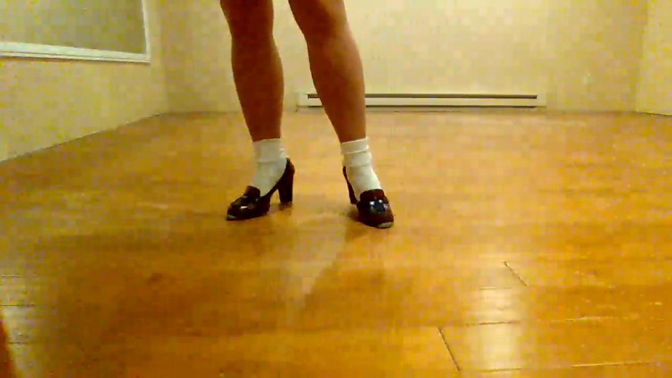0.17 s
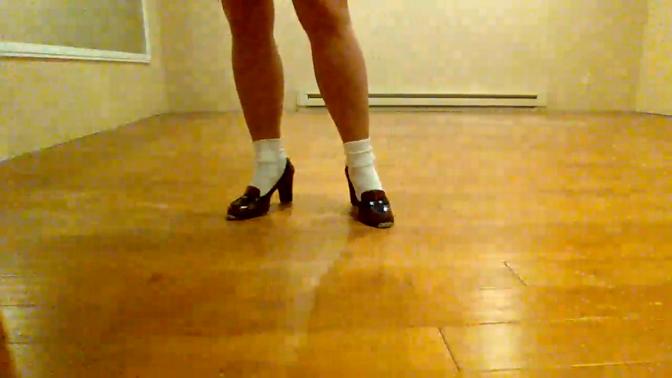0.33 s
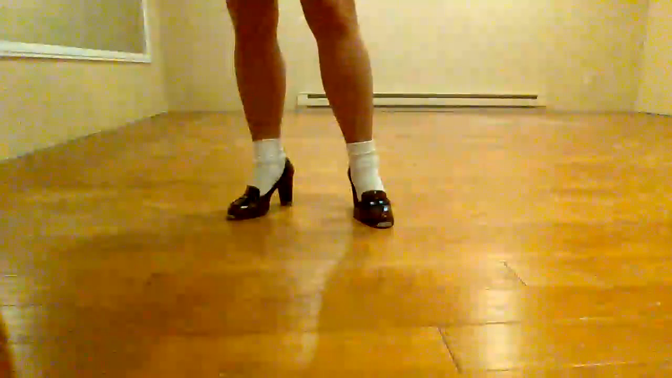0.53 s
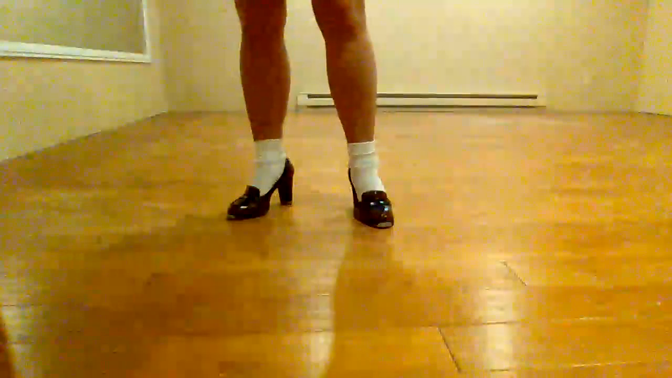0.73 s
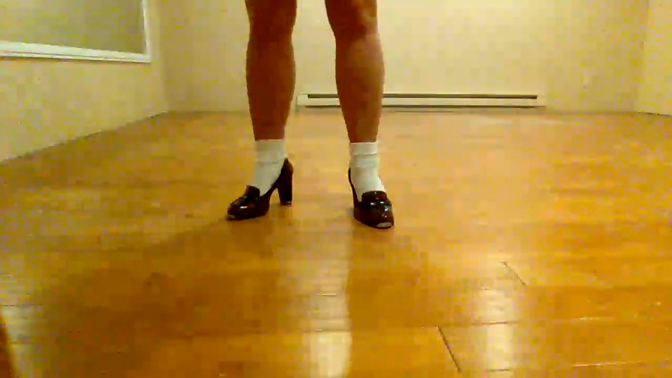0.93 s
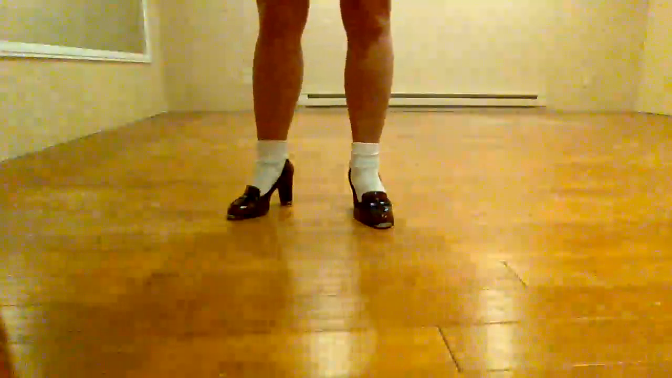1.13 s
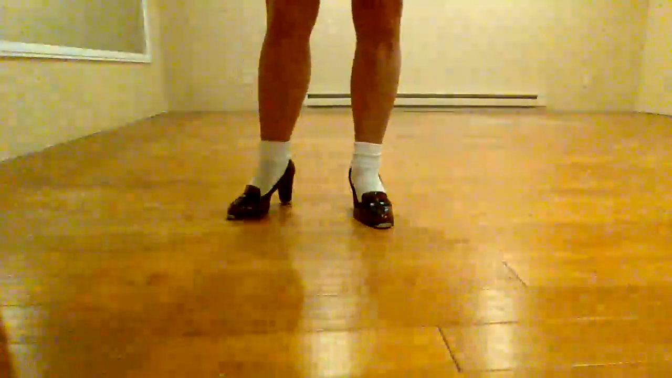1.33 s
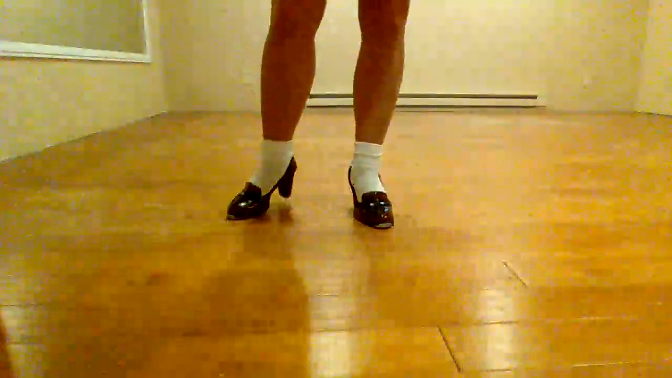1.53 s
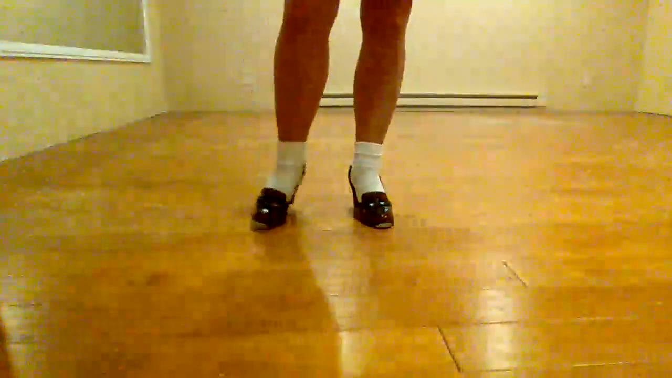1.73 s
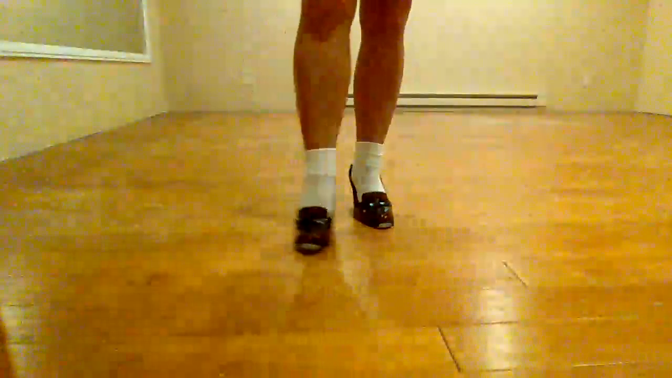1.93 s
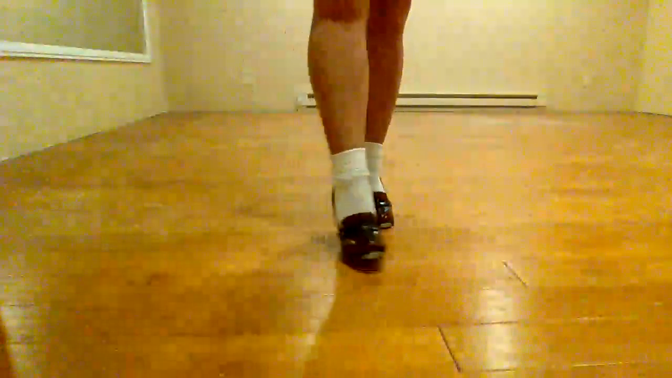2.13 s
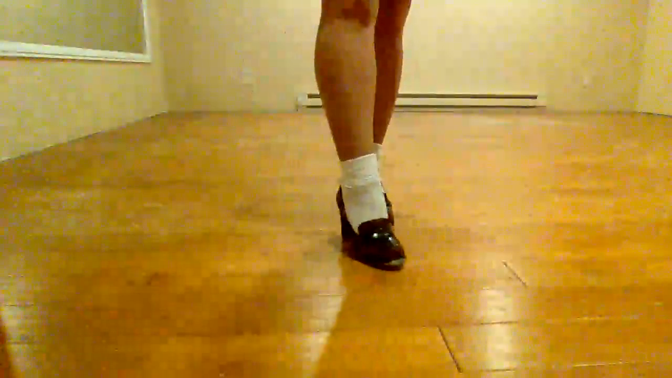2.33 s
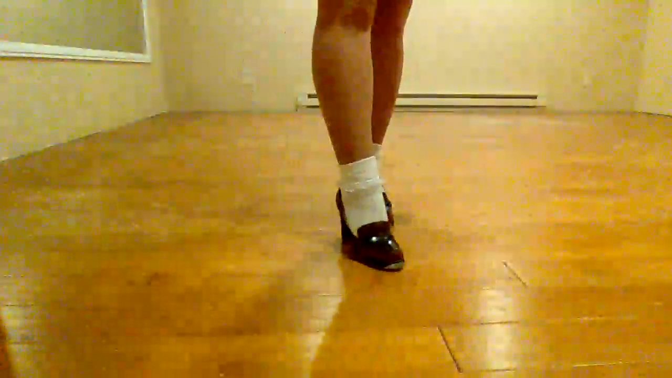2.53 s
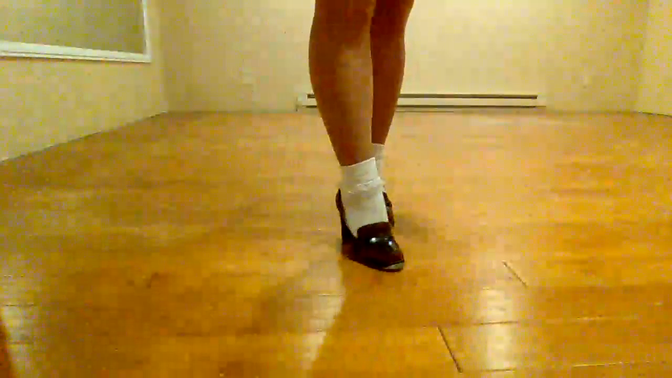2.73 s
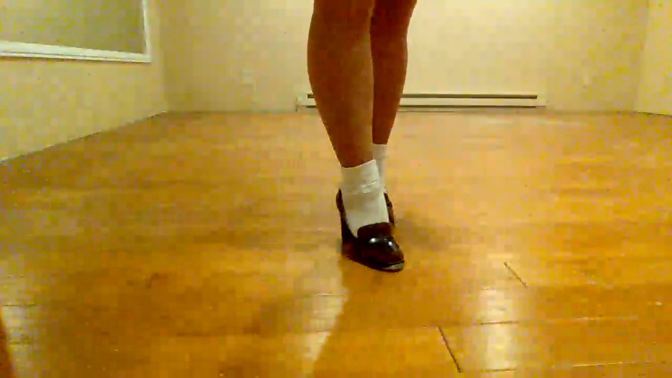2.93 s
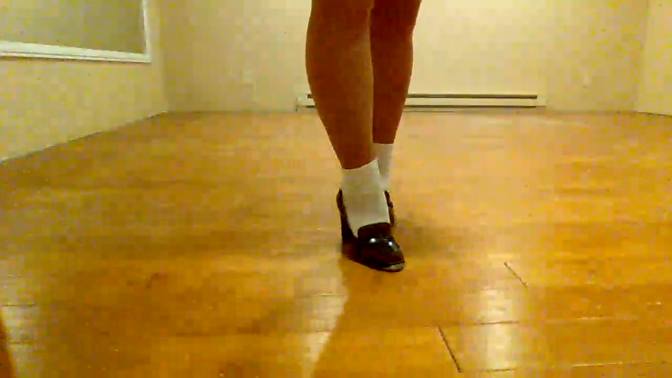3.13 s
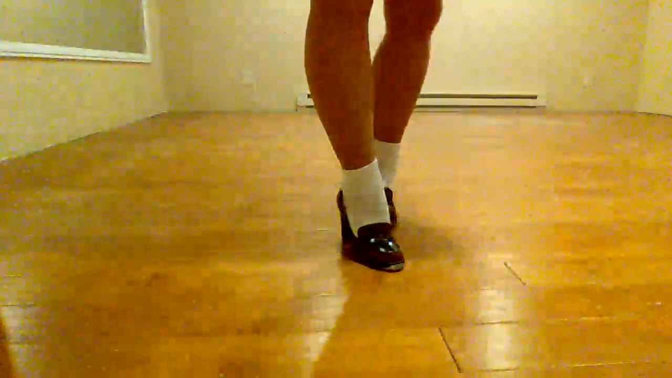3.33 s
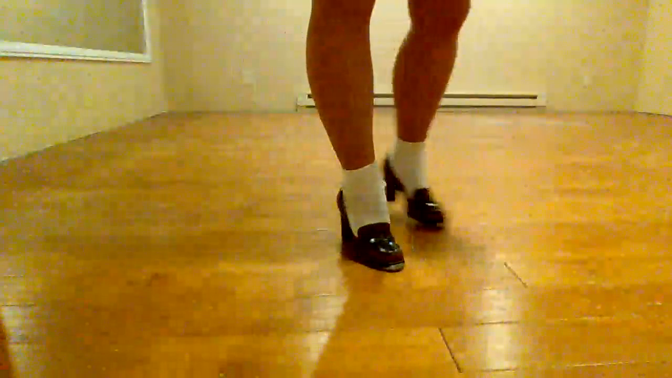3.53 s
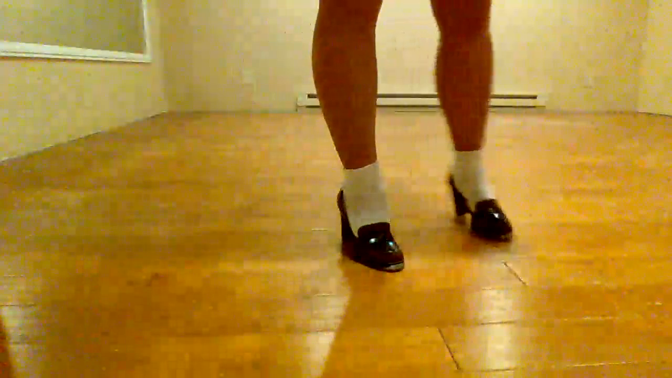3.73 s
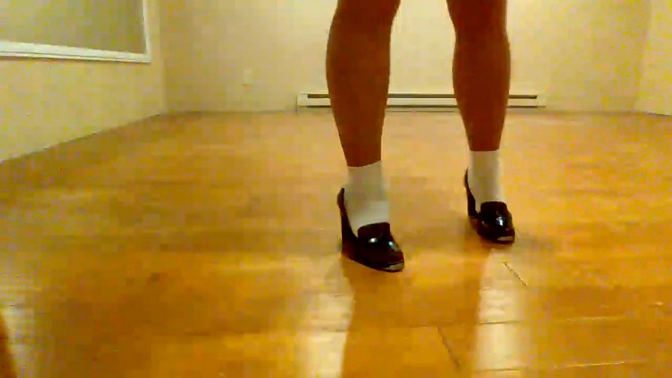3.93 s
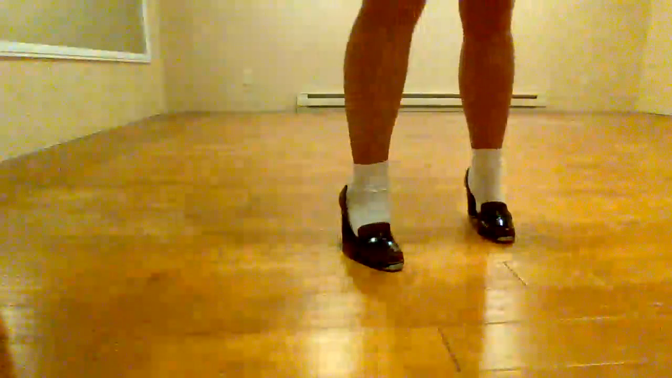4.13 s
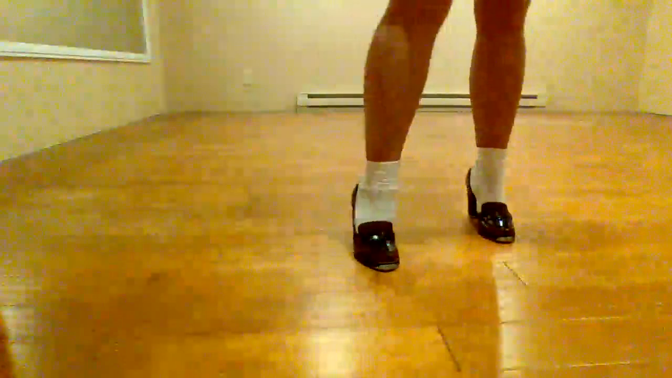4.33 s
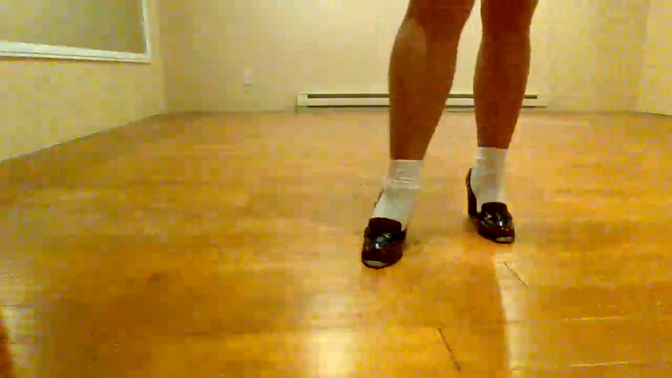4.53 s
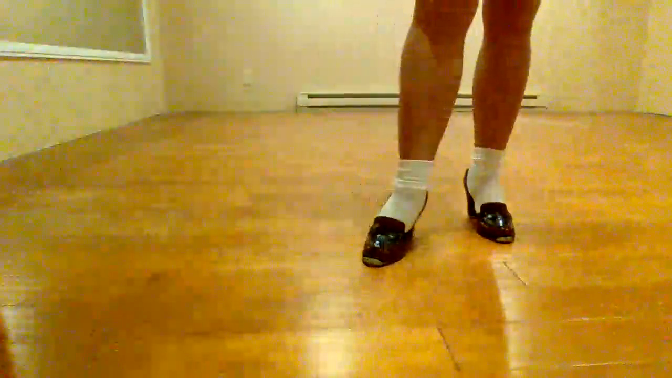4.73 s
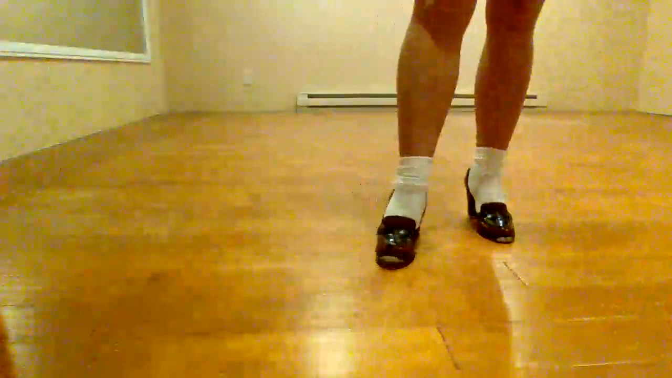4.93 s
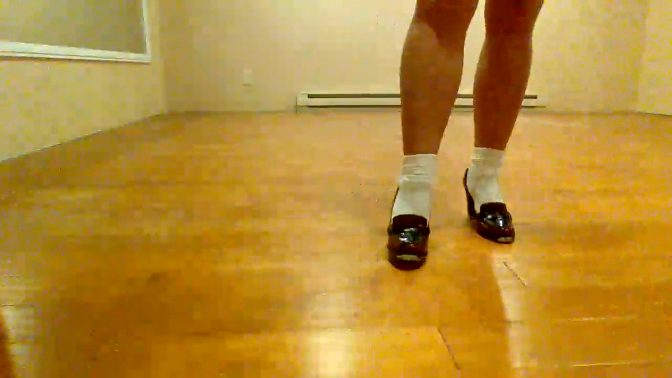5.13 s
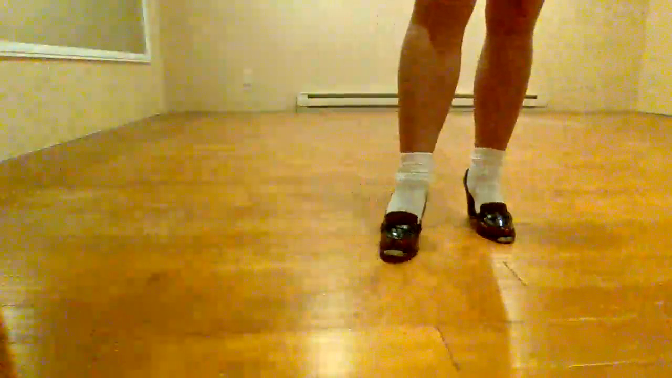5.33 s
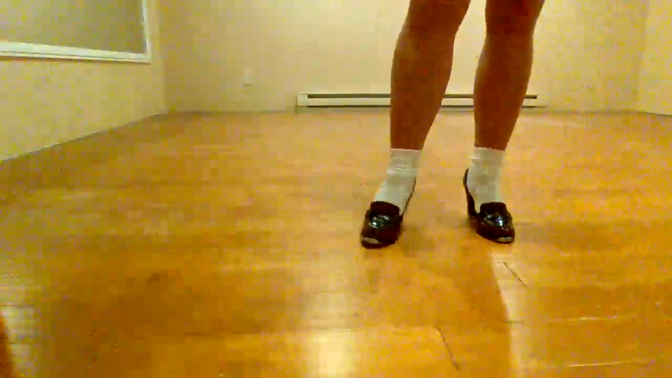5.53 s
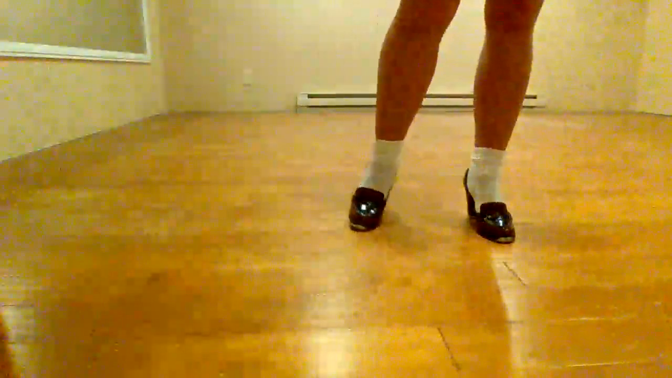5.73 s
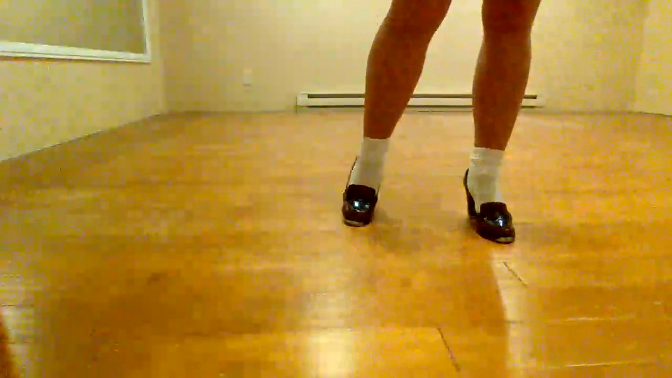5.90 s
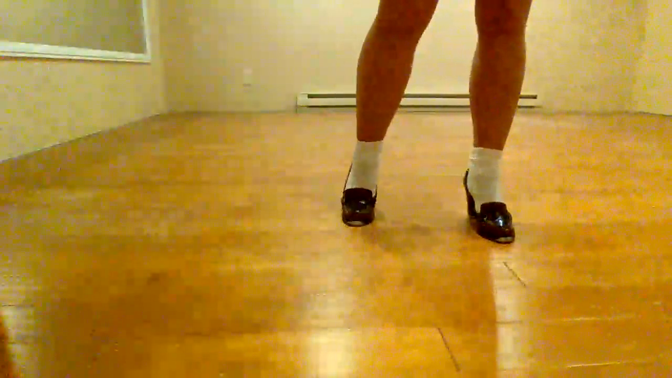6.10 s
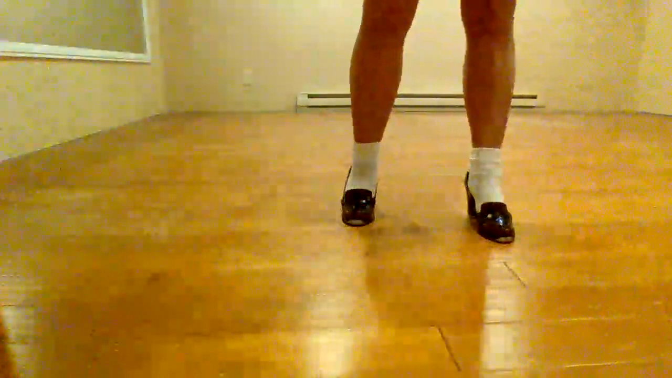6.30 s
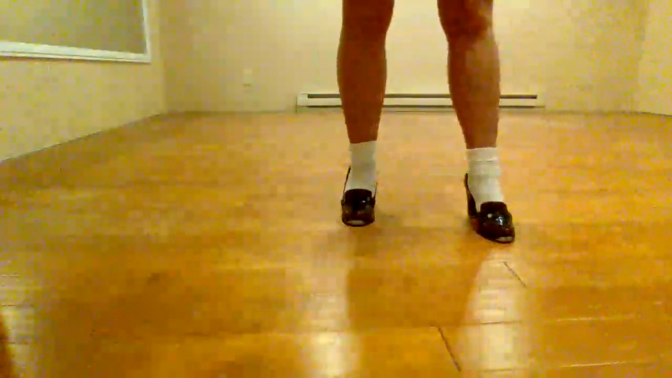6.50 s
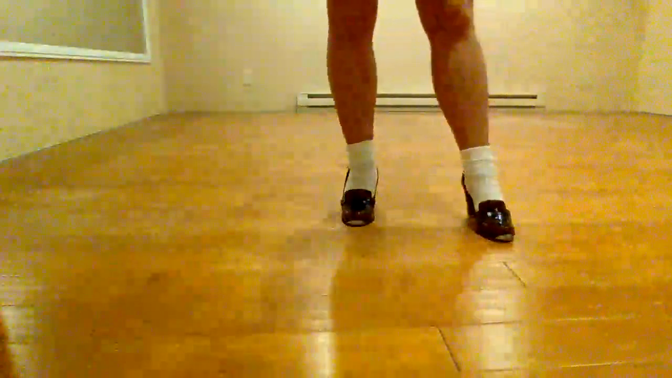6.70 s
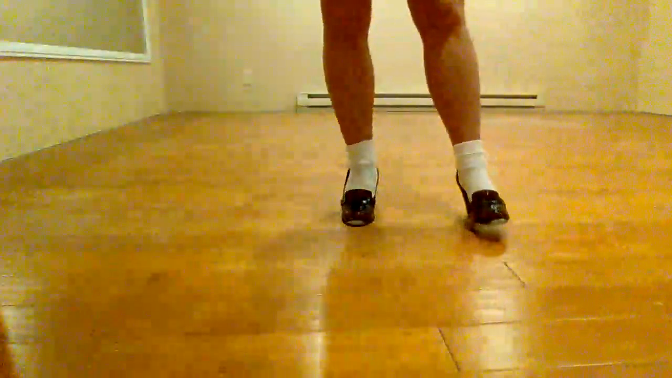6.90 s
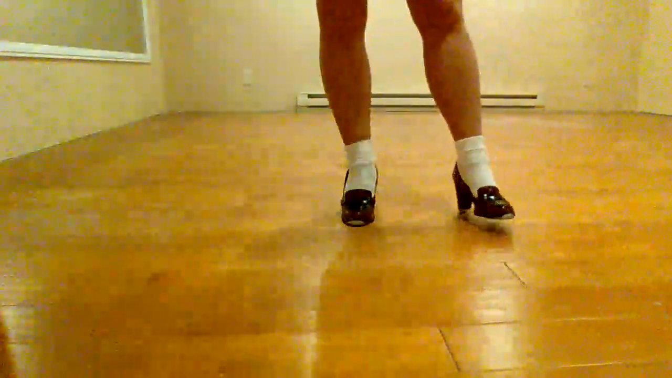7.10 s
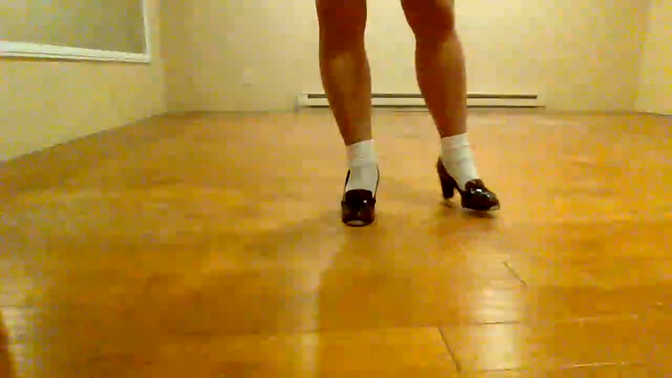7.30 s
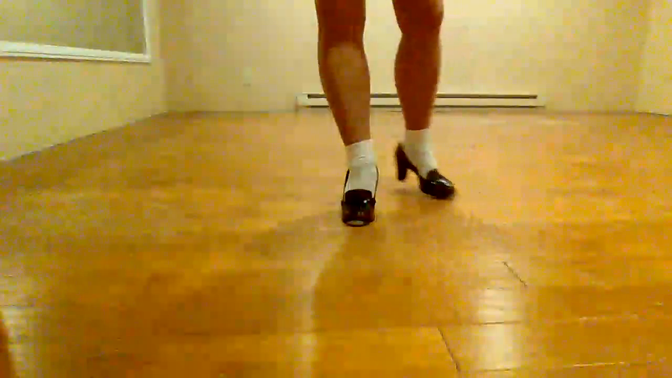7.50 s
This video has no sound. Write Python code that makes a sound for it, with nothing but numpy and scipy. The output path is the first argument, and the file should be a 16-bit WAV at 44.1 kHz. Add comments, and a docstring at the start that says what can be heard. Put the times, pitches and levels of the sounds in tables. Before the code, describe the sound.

In an empty, live room, tap shoes shift weight and step one at a time. Soft first contact, a pause, then hard metallic clacks in a close cluster, dry ticks, another cluster, quieter touches, one very sharp strike, and finally a thin scraping slide that quickens. Close, low microphone; slight low rumble and airy hiss underneath.

```python
"""Slow steps in tap shoes

Heeled tap shoes step slowly on a hardwood floor in a bare, echoing room.
Each contact is filtered clicking noise for knock, clack and snap, with decaying sines for steel and boards.
Modulated noise makes the scuffs, the turning sole and the plate dragged at the end, which also squeaks.
Shoe ticks are filtered clicks; low rumble and a faint swelling hiss lie underneath.
"""
import sys
import numpy as np
from scipy import signal
from scipy.fft import rfft, irfft, next_fast_len
from scipy.io import wavfile
from scipy.ndimage import map_coordinates

SR = 44100
rng = np.random.default_rng(int(sys.argv[2]) if len(sys.argv) > 2 else 0)


def file_out(sig):
    """Save sig as 16-bit WAV at sys.argv[1]."""
    # one column per channel
    cols = np.atleast_2d(sig).T
    # limit, then scale
    lim = np.clip(cols, -1, 1)
    pcm = np.round(lim * 32767).astype(np.int16)
    wavfile.write(sys.argv[1], SR, pcm)


N = 337541

# Levels below are relative: layer gains and random scatter come on top.
# Plate contacts. Each row: start in seconds, clack level in dB, board thud level in dB,
# wood knock level in dB, metal snap level in dB, centre of the clack's resonance in Hz.
CONTACTS = [(0.3742, -61.5, -57.5, -58.5, -84, 2080), (.450, -41.5, -69, -50, -71, 2000),
            (.457, -36, -87, -62, -53, 4900), (.468, -48, -38.5, -52, -52, 3300),
            (1.283, -80, -62, -63.5, -80, 1100), (1.650, -58, -78, -61.5, -68, 4670),
            (1.956, -44, -74, -52, -85, 2390), (1.971, -32, -50, -46, -54, 5700),
            (1.9746, -30.5, -37.5, -42.5, -36.5, 5400), (2.078, -36.5, -49.5, -56, -51, 3440),
            (2.3456, -24, -28.5, -33, -30.5, 6100), (2.444, -35.5, -41, -41.5, -45.5, 5330),
            (3.475, -53, -52.5, -54.5, -70, 2200), (3.484, -48.5, -64, -50.5, -70, 2220),
            (3.707, -40.5, -54.5, -55, -49.5, 4400), (3.758, -30.5, -67, -47, -60, 5100),
            (3.768, -31.5, -31.5, -42.5, -41, 4960), (3.8165, -29.5, -41.5, -35, -39.5, 1960),
            (3.857, -34, -53, -58, -39.5, 1900), (4.718, -50.5, -35, -57.5, -88, 3940),
            (4.912, -50, -87, -60, -78, 5130), (5.177, -63, -62.5, -64, -77, 2960),
            (5.854, -48.5, -51.5, -47, -71, 5760), (6.068, -70, -52.5, -66.5, -75, 2000),
            (6.1547, -46, -56.5, -52, -65, 2350), (6.2671, -23.5, -29, -40, -37, 6300),
            (6.2717, -24, -39, -41.5, -53, 3420), (7.014, -46, -61.5, -54, -67, 4900),
            (7.557, -34.5, -66, -53, -70, 3540)]
# Small dry ticks of shoe and plate. Each row: start in seconds, level in dB.
SHOE_TICKS = [(0.644, -47), (.8825, -47.5), (1.023, -52), (1.146, -49.5), (1.6249, -47.5), (2.4445, -30),
              (2.550, -52), (2.594, -40), (2.609, -41), (2.615, -38), (2.651, -43.5), (2.738, -43.5),
              (2.7762, -42.5), (2.855, -49), (4.914, -43.5)]
# Brief skids of a plate. Each row: start in seconds, length in seconds, level in dB, resonance in Hz.
SKIDS = [(0.64, 0.0089, -54.5, 4850), (1.023, 0.0096, -59.5, 3000), (1.978, 0.1, -40, 5160),
         (2.076, 0.017, -38, 3400), (3.199, 0.018, -60, 1930), (3.463, 0.027, -52.5, 1900),
         (3.775, 0.089, -43, 5000), (4.268, 0.14, -65.5, 1150), (4.869, 0.055, -63, 2200),
         (7.03, 0.034, -48, 5230), (7.558, 0.064, -44.5, 4660)]
# A sole turns on the wood. Each row: start in seconds, length in seconds, level in dB.
SOLE_TURNS = [(.86, 0.25, -62.5), (1.1, 0.25, -59)]
# The slide's thin stick-slip tone. Each row: start in seconds, length in seconds, level in dB.
SQUEAKS = [(7.32, .1, -58)]
# Swells of faint high hiss. Each row: start in seconds, length in seconds, level in dB.
HISS_SWELLS = [(.78, 0.91, -61), (2.45, 0.32, -65), (2.85, 0.95, -63), (3.7, 0.19, -50), (5.65, .55, -70),
               (6.3, 0.34, -57.5)]

# Steel plate modes. Each row: nominal frequency in Hz, level in dB, 60 dB decay time in seconds.
PLATE_MODES = [(2020, -8, 0.37), (2150, 8.5, 0.097), (2377, 6, 0.24), (2750, -2, 0.23), (2954, 9, 0.16),
               (3370, -2.5, 0.4), (3600, -17, 0.2), (4710, 10, 0.17), (4920, -13, 0.36), (4980, -2, 0.083),
               (5970, -16, 0.11)]
# Floorboard modes. Each row: nominal frequency in Hz, level in dB, 60 dB decay time in seconds.
BOARD_MODES = [(83.9, -13, 0.29), (130, -8.5, 0.043), (155.5, 0, 0.23), (181, 0, 0.082), (278, -5, 0.086),
               (338, -25, 0.1), (473.6, -11, 0.16), (765, -25.5, 0.17)]
# Fade of the room's diffuse tail. Each row: frequency in Hz, 60 dB decay time in seconds.
ROOM_DECAY = [(90, 0.21), (200, 0.36), (400, 0.78), (900, 0.92), (2000, 0.78), (3500, 0.66), (5500, 0.46),
              (8000, 0.37), (15000, 0.29)]

# Spectra of the sources. Each row of each table: frequency in Hz, level in dB per Hz.
# Wood knock, plate clack and bright metal snap of a contact:
KNOCK_SPECTRUM = [(200, -32.5), (420, 2), (620, -3), (950, -2), (1250, -2), (1800, -3), (2600, -9.5),
                  (6000, -69)]
CLACK_SPECTRUM = [(600, -49.5), (1500, -27), (2150, 1), (3300, 1.5), (4300, -1), (6000, -4.5), (7500, -16),
                  (12000, -41)]
SNAP_SPECTRUM = [(3000, -47), (6000, -2), (7800, -3), (10500, -3), (13000, -10.5), (15000, -7),
                 (16000, -15)]
# The boards' sound in the room:
BOOM_SPECTRUM = [(70, -29.5), (115, -10), (150, 2.5), (280, -1), (400, -9), (490, -23), (620, -36),
                 (1500, -61)]
# A single tick of the shoe:
TICK_SPECTRUM = [(1000, -34), (3200, -16), (4600, -1), (7500, 0), (9000, -14), (12000, -28)]
# Skidding plate, dragged plate and turning sole:
SKID_SPECTRUM = [(150, -21), (400, 0.5), (1100, 1.5), (1600, -1.5), (2500, 2), (5500, 2), (7500, -6.5),
                 (10500, -12), (15500, -17)]
DRAG_SPECTRUM = [(200, -21), (400, 8), (600, -3.5), (1100, 5), (1600, 3), (2300, -2.5), (2750, 4.5),
                 (3100, 7.5), (3600, 3), (4100, -8), (4700, -6.5), (6500, -15), (8500, -5.5), (11000, -26),
                 (15000, -50)]
SWIVEL_SPECTRUM = [(150, -31), (250, 0.5), (1010, -0.5), (1370, -9), (2050, -2.5), (7260, -12),
                   (12000, -10), (15600, -26), (22000, -120)]
# Room rumble and swelling hiss:
AIR_SPECTRUM = [(12, -27), (20, 1), (53, -7.5), (163, -16.5), (187, -18.5), (328, -22), (434, -26.5),
                (472, -19.5), (513, -30), (718, -31), (4810, -36), (13900, -36), (16000, -35.5)]
HISS_SPECTRUM = [(3000, -16), (8000, -2), (11000, 3.5), (15500, 7.5)]

AIR_DB = -62.5
TOP_HZ = 15900
# Each tick slips once more, about this much later and this much weaker.
RESLIP_S, RESLIP_DB = 0.011, -9
# The long slide: the plate glides evenly, speeds up, then is flicked off the floor.
DRAG_START_S, DRAG_DB, DRAG_RISE_S = 7.02, -60.5, 0.019
SPEED_UP_S, SPEED_UP_DB_PER_S = 7.37, 38.5
FLICK_S, FLICK_DB, LIFT_S, LIFT_DB_PER_S = 7.555, 10.5, 7.61, 400


def taps(clack_gain_db=-3, knock_gain_db=2, snap_gain_db=1, steel_db=-17, wet_db=0, lead_s=0.0031, lead_db=-19):
    """Metal meets wood: a knock, the plate's clack, a bright snap and a brief steel ring."""
    out = np.zeros(N)
    for s, clack_db, _, knock_db, snap_db, ring_hz in CONTACTS:
        tail = amp(wet_db) * room_tail()
        clack = burst(CLACK_SPECTRUM, 0.0021, tail, ring_hz=ring_hz, ring_db=10)
        clack *= amp(clack_db + clack_gain_db)
        knock = amp(knock_db + knock_gain_db) * burst(KNOCK_SPECTRUM, 0.0054, tail, rise_s=0.00015)
        snap = amp(snap_db + snap_gain_db) * burst(SNAP_SPECTRUM, 0.00092, tail)
        add(out, s, clack + knock + snap)
        steel = ringing(PLATE_MODES, scatter_db=6.5, detune=0.002, attack_s=0.00087)
        add(out, s, amp(clack_db + steel_db) * steel)
        # the plate's edge touches just before it lies flat
        add(out, s - lead_s, amp(lead_db) * clack)
    return out


def burst(spectrum, life_s, tail, ring_hz=1000, ring_db=0, rise_s=0.00066):
    """A contact rattles for milliseconds (energy of 5 ms at rms 1); blow and rattle both excite the room."""
    t = np.arange(SR // 20) / SR
    rattle = rng.choice([-1, 1], len(t)) * np.exp(-t / life_s) * (1 - np.exp(-t / rise_s))
    rattle /= np.linalg.norm(rattle)
    room_from_blow = .95 * tail
    room_from_rattle = .3 * signal.fftconvolve(tail, rattle)[:len(tail)]
    sound = room_from_blow + room_from_rattle
    add(sound, 0, rattle)
    # only the direct rattle sets the level; the room comes on top
    direct = colour(rattle, spectrum, ring_hz, ring_db)
    return colour(sound, spectrum, ring_hz, ring_db) * np.sqrt(SR / 200) / np.linalg.norm(direct)


def thuds(gain_db=-1, wet_db=4, low_hz=100):
    """The boards give under each contact and set the bare room booming; the boom carries little deep bass."""
    out = np.zeros(N)
    for s, _, thud_db, *_ in CONTACTS:
        boards = ringing(BOARD_MODES, scatter_db=2.5, detune=.015, attack_s=0.0017)
        boom = colour(room_tail(), BOOM_SPECTRUM)
        boom *= amp(wet_db) / np.linalg.norm(boom) * np.linalg.norm(boards) / 2
        add(boom, 0, boards)
        add(out, s, amp(thud_db + gain_db) * boom)
    bass_cut = signal.butter(3, low_hz, "high", fs=SR, output="sos")
    return signal.sosfilt(bass_cut, out)


def ticks(gain_db=10, wet_db=-9, ring_hz=6200):
    """Shoe and plate tick as the weight shifts: a slip and a weaker second one, each pair with its own pitch."""
    out = np.zeros(N)
    slip = signal.unit_impulse(SR // 50)
    variations = rng.standard_normal((len(SHOE_TICKS), 2))
    for (s, db), (shift, wait) in zip(SHOE_TICKS, variations):
        tick = colour(slip, TICK_SPECTRUM, ring_hz * np.exp(.1 * shift), ring_db=6)
        tick *= amp(db + gain_db) / np.linalg.norm(tick)
        add(out, s, tick)
        add(out, s + RESLIP_S * np.exp(0.34 * wait), amp(RESLIP_DB) * tick)
    return in_room(out, wet_db)[:N]


def scuffs(wet_db=1, ring_db=7, rise_share=0.08):
    """A landing plate bites, skids and chatters, fading as it stops."""
    out = np.zeros(N)
    for s, length, db, ring_hz in SKIDS:
        progress = np.linspace(0, 1, int(length * SR))
        grit = friction(len(progress), rough_db=8.5)
        skid = unit(colour(grit, SKID_SPECTRUM, ring_hz, ring_db))
        envelope = np.sqrt(1 - progress) * np.minimum(progress / rise_share, 1)
        add(out, s, amp(db) * skid * envelope)
    return in_room(out, wet_db)[:N]


def dragged_plate(judder_db=2, steel_db=-13, chatter_db=1.0):
    """Friction drives the plate's steel modes; rub and ring judder together."""
    rub = unit(colour(friction(N, rough_db=4.0), DRAG_SPECTRUM))
    plate = ringing(PLATE_MODES, scatter_db=6, detune=0.0011, attack_s=0.00083)
    steel = unit(signal.fftconvolve(rub, plate)[:N])
    judder = amp(judder_db * wobble(25))
    chatter = amp(steel_db + chatter_db * wobble(18))
    return judder * drag_gain() * (rub + chatter * steel)


def drag_gain():
    """The slide sets in, grows as the foot speeds up, jumps at the flick and dies as the plate lifts."""
    t = np.arange(N) / SR
    db = DRAG_DB + SPEED_UP_DB_PER_S * np.maximum(t - SPEED_UP_S, 0)
    db += FLICK_DB * (t > FLICK_S)
    db -= LIFT_DB_PER_S * np.maximum(t - LIFT_S, 0)
    return amp(db) * np.clip((t - DRAG_START_S) / DRAG_RISE_S, 0, 1)


def squeak(centre_hz=790):
    """Stick-slip tone of the drag: a sine whose pitch trembles quickly."""
    hz = centre_hz * (1 + 0.0307 * wobble(120))
    return swells(SQUEAKS) * np.sin(2 * np.pi * np.cumsum(hz) / SR)


def swivel(gain_db=-5):
    """A turning sole only rustles: rough friction noise without a ring."""
    rustle = unit(colour(friction(N, rough_db=8.0), SWIVEL_SPECTRUM))
    return amp(gain_db) * swells(SOLE_TURNS) * rustle


def slides(wet_db=0):
    """Dragged plate, squeak and turning sole sound together in the room."""
    return in_room(dragged_plate() + squeak() + swivel(), wet_db)[:N]


def room_tail(build_s=0.0039, wall_db=-22, count=8):
    """Wall echoes over a diffuse tail of unit energy, drawn anew for every spot on the floor."""
    hz, t, z = signal.stft(rng.standard_normal(SR), SR, nperseg=256)
    fade = amp(-60 * t / along(ROOM_DECAY, hz)[:, None]) * (1 - np.exp(-t / build_s))
    tail = signal.istft(z * fade, SR, nperseg=256)[1]
    tail /= np.linalg.norm(tail)
    echoes = (rng.uniform(.005, .04, count) * SR).astype(int)
    tail[echoes] += amp(wall_db)
    return tail


def in_room(x, wet_db):
    """The sound followed by the room's answer."""
    response = amp(wet_db) * room_tail()
    response[0] += 1
    return signal.fftconvolve(x, response)


def ringing(table, scatter_db, detune, attack_s):
    """Struck modes, a little different at every blow; spread 1 over the first 40 ms."""
    t = np.arange(SR // 2) / SR
    hz, db, t60 = np.transpose(table)[:, :, None]
    strength, shift = rng.standard_normal((2, len(table), 1))
    decay = amp(db + scatter_db * strength - 60 * t / t60)
    modes = decay * np.sin(2 * np.pi * hz * (1 + detune * shift) * t)
    ring = modes.sum(0) * (1 - np.exp(-t / attack_s))
    return ring / np.std(ring[:SR // 25])


def friction(size, rough_db):
    """Tiny slips over the wood grain: noise whose strength changes every few milliseconds."""
    knots = rng.standard_normal(size // 100 + 4)  # one per 100 samples
    grain = map_coordinates(knots, [np.arange(size) / 100], order=1)
    return rng.standard_normal(size) * amp(rough_db * grain)


def colour(x, spectrum, ring_hz=1000, ring_db=0, ring_width=0.14, size=8192):
    """Causal minimum-phase filter with the given spectrum and one resonance on top."""
    hz = np.fft.rfftfreq(size, 1 / SR)
    resonance = ring_db / (1 + (np.log((hz + 1) / ring_hz) / ring_width) ** 2)
    db = along(spectrum, hz) + resonance
    # folding the cepstrum puts the response after time zero
    cepstrum = irfft(np.log(amp(db)))
    cepstrum[1:size // 2] *= 2
    cepstrum[size // 2 + 1:] = 0
    response = irfft(np.exp(rfft(cepstrum)))
    return signal.fftconvolve(x, response)[:len(x)]


def wobble(rate):
    """A smooth random curve with rate knots a second."""
    knots = rng.standard_normal(int(N * rate / SR) + 4)
    return map_coordinates(knots, [np.arange(N) * rate / SR])


def swells(rows):
    """Gain per sample: each row of start, length and dB rises and falls in one arch."""
    t = np.arange(N) / SR
    return sum(amp(db) * np.sin(np.pi * np.clip((t - s) / length, 0, 1)) for s, length, db in rows)


def amp(db):
    """Decibels to gain."""
    return 10 ** (np.asarray(db) / 20)


def unit(x):
    """Scaled to rms 1."""
    return x / np.sqrt(np.mean(x ** 2) + 1e-20)


def along(points, hz):
    """Rows of frequency and value, interpolated on a log frequency axis."""
    f, v = np.transpose(points)
    return np.interp(np.log(hz + 1), np.log(f), v)


def add(track, s, x):
    """Mix x into the track at time s."""
    part = track[max(round(s * SR), 0):][:len(x)]
    part += x[:len(part)]


def background(hiss_db=-3):
    """Steady noise weighted to low room rumble, and a faint high hiss that swells and sinks."""
    air = amp(AIR_DB) * unit(colour(rng.standard_normal(N), AIR_SPECTRUM))
    hiss = unit(colour(rng.standard_normal(N), HISS_SPECTRUM))
    return air + amp(hiss_db) * swells(HISS_SWELLS) * hiss


def scene():
    """Everything as heard from one spot near the floor."""
    steps = taps() + thuds() + ticks()
    rubbing = scuffs() + slides()
    return (steps + rubbing + background())[None]


def record(dry):
    """The treble ends sharply: nothing is kept from TOP_HZ upwards."""
    size = next_fast_len(N + SR // 2)
    kept = np.fft.rfftfreq(size, 1 / SR) < TOP_HZ
    return irfft(rfft(dry, size) * kept, size)[:, :N]


dry = scene()
out = record(dry)
file_out(out)
```